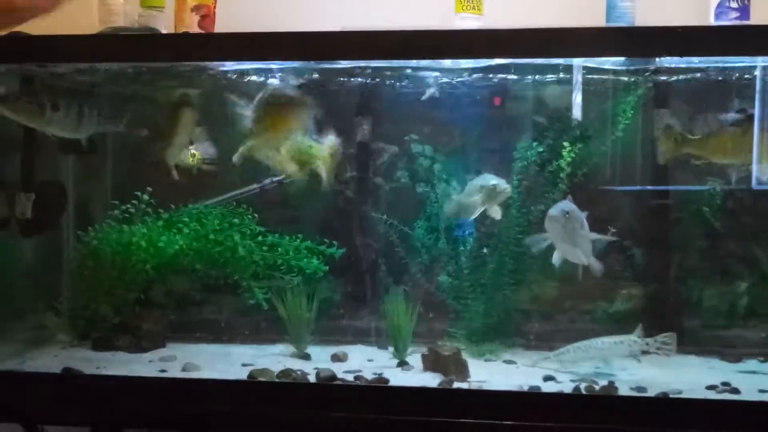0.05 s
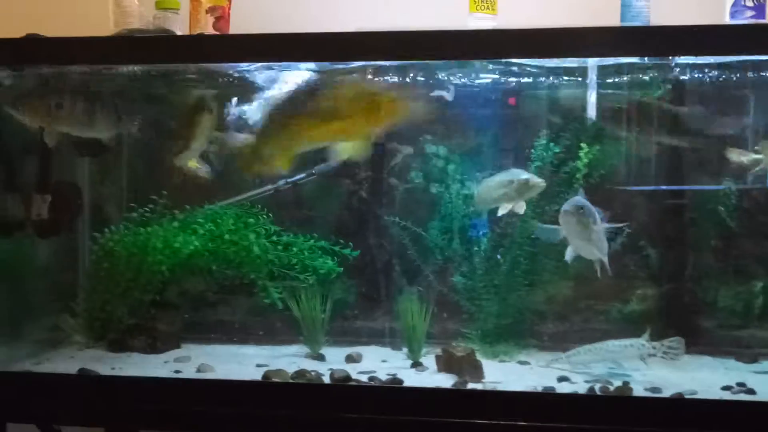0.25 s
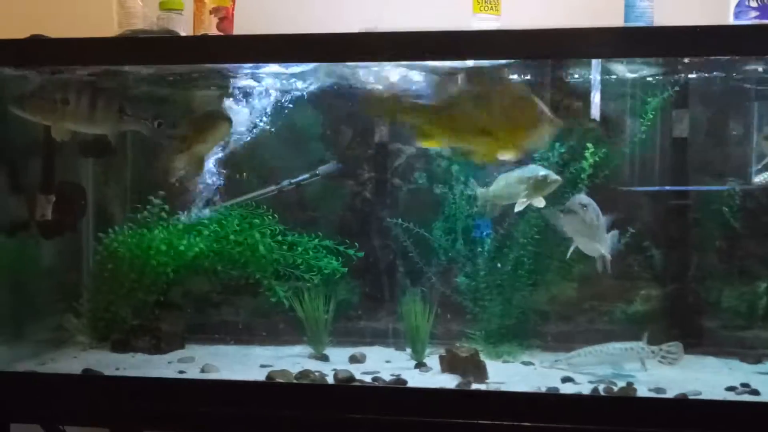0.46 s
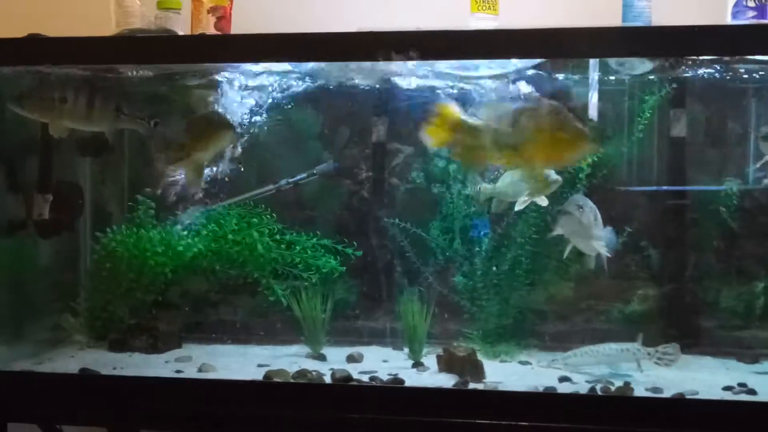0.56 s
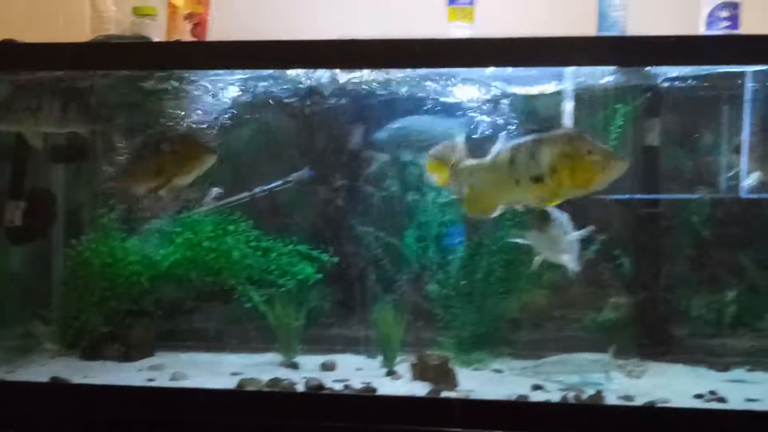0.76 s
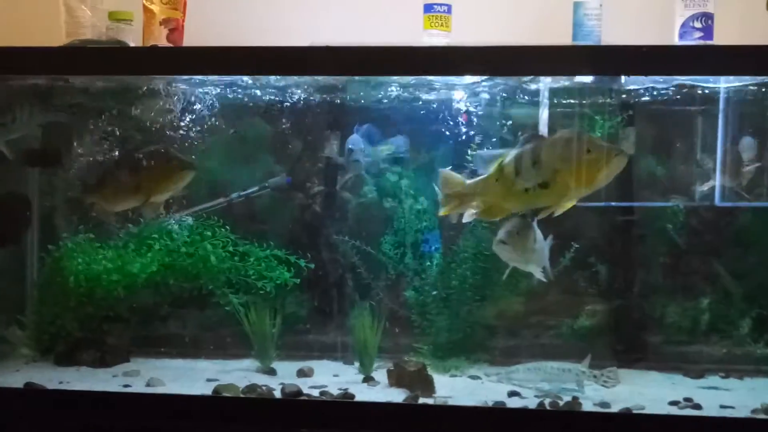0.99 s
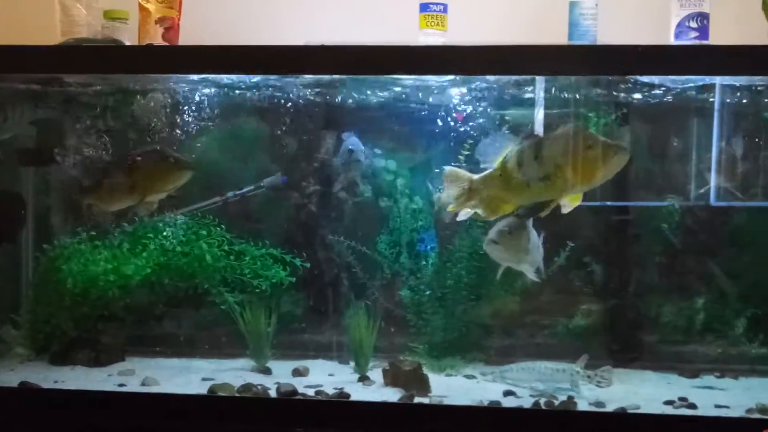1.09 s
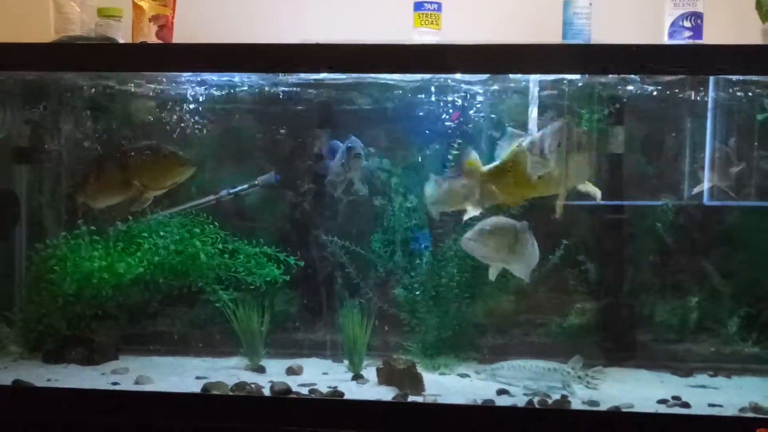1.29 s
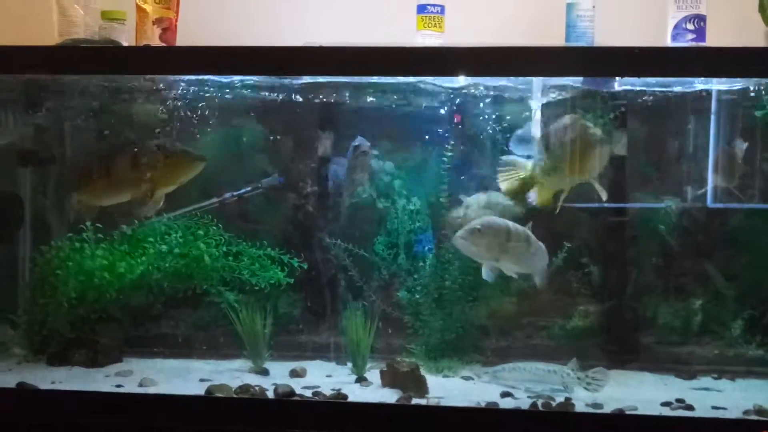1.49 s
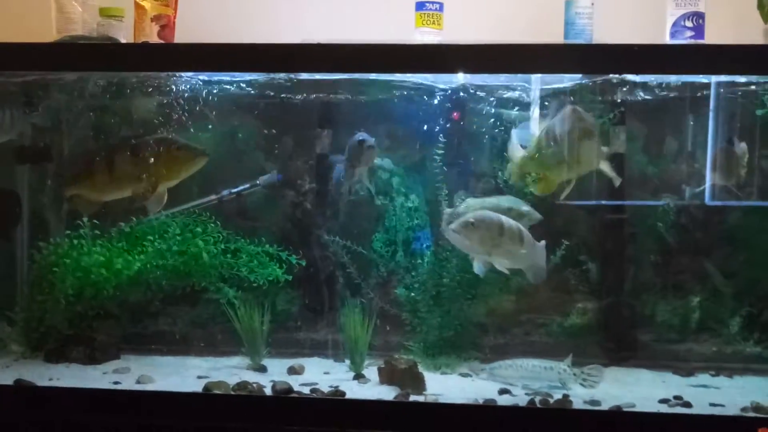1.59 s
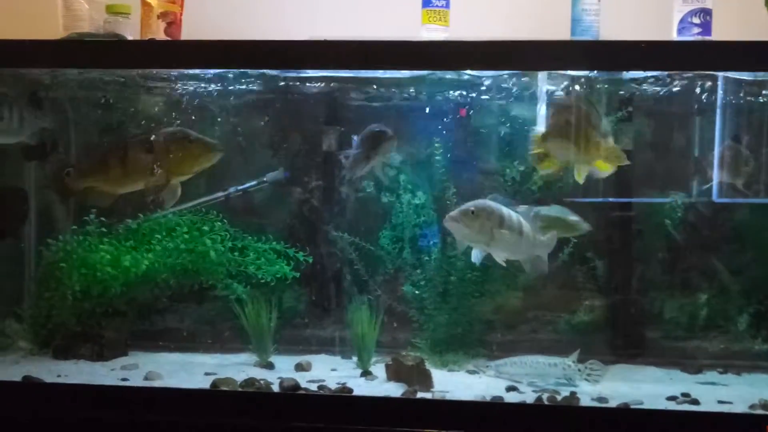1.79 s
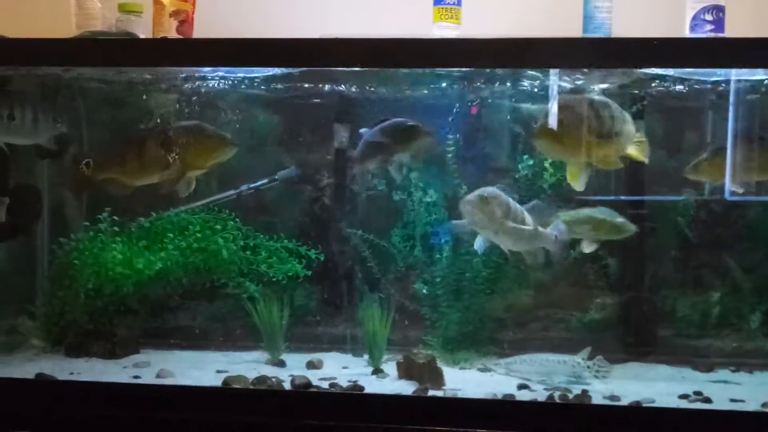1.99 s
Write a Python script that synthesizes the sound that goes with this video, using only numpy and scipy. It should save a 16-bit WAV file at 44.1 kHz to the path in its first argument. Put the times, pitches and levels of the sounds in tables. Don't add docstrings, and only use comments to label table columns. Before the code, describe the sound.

Big aquarium fish strike the surface, gulping and splashing hard, followed by fading drips and pump hum

```python
import sys
import numpy as np
from scipy import signal
from scipy.fft import rfft, irfft, next_fast_len
from scipy.io import wavfile
from scipy.ndimage import uniform_filter1d, map_coordinates

SR = 44100
rng = np.random.default_rng(int(sys.argv[2]) if len(sys.argv) > 2 else 0)


def gain_from_decibels(decibels):
    exponent = np.asarray(decibels, float) / 20
    return 10 ** exponent


def file_out(sig):
    cols = np.atleast_2d(sig).T
    lim = np.clip(cols, -1, 1)
    pcm = np.round(lim * 32767).astype(np.int16)
    wavfile.write(sys.argv[1], SR, pcm)


N = 90404
T = np.arange(N) / SR


def unit(x):
    return x / np.sqrt(np.mean(x ** 2) + 1e-20)


def wobble(rate):
    knots = rng.standard_normal(int(N * rate / SR) + 4)
    return map_coordinates(knots, [T * rate])


def filtered(x, response):
    size = next_fast_len(N + SR // 2)
    hz = np.fft.rfftfreq(size, 1 / SR)
    return irfft(rfft(x, size) * response(hz), size)[:N]


def along(points, hz):
    point_hz, value = np.transpose(points)
    return np.interp(np.log(hz + 1), np.log(point_hz + 1), value)


def coloured(x, spectrum):
    return unit(filtered(x, lambda hz: gain_from_decibels(along(spectrum, hz))))


def patchy(db):
    z = signal.stft(rng.standard_normal(N + 512), nperseg=512)[2]
    field = uniform_filter1d(rng.standard_normal(z.shape), 5, 0)
    field = unit(uniform_filter1d(field, 6, 1))
    return unit(signal.istft(z * gain_from_decibels(db * field), nperseg=512)[1][:N])


def grains(cycles, count):
    u = rng.random((count, 3))
    t = np.arange(600) / SR
    hz = 300 * 20 ** u[:, 1:2]
    ring = np.sin(2 * np.pi * hz * t) * np.exp(-hz * t / cycles) * (1 - np.exp(-hz * t))
    strength = hz * gain_from_decibels(-2.5 * np.log(u[:, 2:] + .02))
    at = (u[:, :1] * N).astype(int) + np.arange(len(t))
    return unit(np.bincount(at.ravel(), (strength * ring).ravel())[:N])


def room(x):
    # (frequency [Hz], t60 [s])
    decay = [(200, 0.42), (1500, 0.34), (5000, 0.33), (12000, 0.067)]
    hz, t, z = signal.stft(rng.standard_normal(SR // 2), SR, nperseg=256)
    fade = gain_from_decibels(-60 * t / along(decay, hz)[:, None])
    tail = signal.istft(z * fade, SR, nperseg=256)[1]
    late = np.pad(x, (350, 0))
    return signal.fftconvolve(late, tail / np.linalg.norm(tail))[:N]


def floor():
    # (frequency [Hz], level [dB per Hz])
    trickle_spectrum = [(20, -26), (40, -17), (70, -13), (140, -4), (450, -8), (1600, -18.5), (3100, -27),
                        (3700, -38), (6000, -64)]
    # (frequency [Hz], level [dB per Hz])
    hiss_spectrum = [(2120, -47), (3600, -7), (6640, -6), (7950, -1), (9390, -8.5), (10900, -9),
                     (13400, -26), (14900, -3), (15800, -10)]
    trickle_db, hum_db, hiss_db, patch_db = -51, -56.5, -71, .8
    hum_hz = 124.1
    trickle = gain_from_decibels(trickle_db + 0.27 * wobble(9.04)) * coloured(patchy(patch_db), trickle_spectrum)
    hum_level = gain_from_decibels(hum_db + 1.35 * wobble(13.45))
    hum = hum_level * np.sin(2 * np.pi * hum_hz * T + 0.23 * wobble(4.6))
    hiss = gain_from_decibels(hiss_db) * coloured(patchy(patch_db), hiss_spectrum)
    return trickle + hum + hiss


def bubbles():
    # (start [s], pitch [Hz], peak level [dB], t60 [s])
    single_bubbles = [(0.037, 2805, -39.5, 0.075), (0.053, 2980, -35.5, 0.036), (0.091, 2940, -60, 0.044),
                      (.12, 263, -36.5, 0.16), (0.241, 274, -36, 0.073), (.139, 2715, -41, 0.046),
                      (.166, 2350, -32, 0.058), (.292, 570, -43, 0.031), (.219, 743, -17, 0.032),
                      (0.226, 2630, -36, .04), (.26, 1416, -25.5, 0.067), (0.278, 1288, -7.5, 0.016),
                      (.298, 933, -19, 0.041), (0.305, 1533, -14.5, 0.025), (.405, 536, -29.5, 0.16),
                      (0.423, 2460, -45, 0.091), (.438, 830, -28.5, 0.045), (0.492, 1045, -33.5, 0.13),
                      (.523, 1717, -29.5, 0.073), (0.567, 1777, -40, 0.08), (.655, 670, -35, 0.052),
                      (1.984, 1565, -32.5, 0.041), (.945, 656, -36, 0.11), (1.277, 2900, -54, 0.048)]
    pitch_rise, attack_cycles, wet_db = 0.029, 5.3, -6
    mix = np.zeros(N)
    for start_s, hz, db, t60 in single_bubbles:
        t = np.maximum(T - start_s, 0)
        swell = np.sin(np.pi / 2 * np.minimum(t * hz / attack_cycles, 1)) ** 2
        ring = np.sin(2 * np.pi * hz * t * (1 + pitch_rise * t / t60))
        bubble = swell * gain_from_decibels(db - 60 * t / t60) * ring
        mix += bubble + gain_from_decibels(wet_db) * room(bubble)
    return mix


def slaps():
    # (start [s], coarse foam [dB], fine foam [dB], spray [dB], t60 [s])
    slap_events = [(0.033, -40.5, -47.5, -59, 0.39), (0.138, -50, -48, -63.5, 1),
                   (0.218, -30, -43, -48.5, 0.42), (0.254, -36.5, -57, -55.5, 0.55),
                   (0.295, -36, -40, -42, 0.44), (.513, -42.5, -41.5, -44.5, 0.33),
                   (.61, -46, -46, -66, 0.31), (0.673, -56, -51.5, -52.5, 0.29),
                   (0.777, -44.5, -51, -56, 0.25), (0.859, -49.5, -67, -65, 0.66),
                   (0.933, -45, -46.5, -54, 0.31), (1.696, -65, -73, -64.5, 0.46),
                   (1.741, -58, -58, -67, 0.19), (1.984, -37.5, -47, -72, 0.26)]
    # (start [s], coarse foam [dB], fine foam [dB], spray [dB], t60 [s])
    wash_events = [
        (0.433, -42, -44, -49, 0.73),
        (0.763, -59, -46.5, -58, 0.38),
        (1.75, -68, -59.5, -58, 0.45),
        (2.015, -70, -70, -58, .8),
    ]
    # (frequency [Hz], level [dB per Hz])
    coarse_spectrum = [(76, -46), (130, -15), (344, -8.5), (609, -10), (731, -5.5), (1140, -9), (1330, -8),
                       (2000, -19.5), (2600, -31), (4400, -120)]
    # (frequency [Hz], level [dB per Hz])
    fine_spectrum = [(1100, -22), (1700, -7), (2400, -4), (3300, -7), (3800, -12.5), (4600, -20.5),
                     (6000, -26)]
    # (frequency [Hz], level [dB per Hz])
    spray_spectrum = [(3000, -40), (4500, -11), (6100, -5.5), (7700, -1), (9240, -6.5), (10800, -7),
                      (12800, -23), (14700, -5), (15800, -16)]
    slap_attack_s, wash_attack_s = .002, .02
    snap_db, snap_t60_s = -6, .05
    flutter_db, foam_patch_db, spray_patch_db, wet_db = 2, 3, 2.5, -6
    grains_per_s, grain_cycles, grain_share = 2500, 6, .55

    events = list(slap_events) + list(wash_events)
    start_s, coarse_db, fine_db, spray_db, t60 = np.transpose(events)[..., None]
    attack_s = np.repeat([slap_attack_s, wash_attack_s], [len(slap_events), len(wash_events)])[:, None]
    t = np.maximum(T - start_s, 0)
    decay = gain_from_decibels(-60 * t / t60) + gain_from_decibels(snap_db - 60 * t / snap_t60_s)
    shape = (1 - np.exp(-t / attack_s)) * decay

    def burst(db):
        level = np.sqrt(np.sum((gain_from_decibels(db) * shape) ** 2, axis=0))
        return level * gain_from_decibels(flutter_db * wobble(44.36))

    foam_bubbles = grains(grain_cycles, count=int(grains_per_s * N / SR))
    froth = grain_share * foam_bubbles + (1 - grain_share) * patchy(foam_patch_db)
    coarse = burst(coarse_db) * coloured(froth, coarse_spectrum)
    fine = burst(fine_db) * coloured(froth, fine_spectrum)
    spray = burst(spray_db) * coloured(patchy(spray_patch_db), spray_spectrum)
    splash = coarse + fine + spray
    return splash + gain_from_decibels(wet_db) * room(splash)


def gulps():
    # (peak time [s], pitch
    # [Hz], peak level [dB], swell [s], t60 [s])
    air_pockets = [(.05, 365.6, -26, .012, 0.033), (0.066, 367, -25, .012, 0.056),
                   (.082, 499, -32.5, 0.017, 0.076), (.105, 446.5, -31.5, 0.013, .1),
                   (.128, 485, -41.5, .012, .1), (0.226, 1439, -19, 0.0065, 0.038),
                   (0.231, 1213, -20, .01, 0.078), (0.234, 364.6, -34.5, 0.0125, 0.18),
                   (.262, 366.4, -29.5, 0.01194, 0.14), (.301, 257, -21, 0.00634, 0.15),
                   (0.299, 362.6, -28, 0.0122, 0.173), (.324, 174.3, -11.5, 0.03345, 0.1),
                   (.358, 194.4, -27, .014, 0.058), (0.369, 258.5, -18.5, 0.028, 0.16),
                   (.384, 312, -29, 0.0117, .08), (0.397, 362.3, -22, 0.016, 0.085),
                   (.418, 253.5, -26.5, .012, 0.068), (0.437, 354, -22, .01, 0.029),
                   (.45, 448.7, -27, 0.01722, 0.045), (.445, 256.7, -31.5, 0.01428, 0.14),
                   (.488, 234, -50, .015, 0.072), (.776, 814.4, -31.5, .018, 0.19),
                   (.89, 812, -41.5, .018, 0.093), (1.995, 158, -43, 0.015, .15)]
    rise_hz_per_s = 220
    rough_db, surge_db, wet_db = -0.5, -9, -12.5

    peak_s, hz, db, swell_s, t60 = np.transpose(air_pockets)[..., None]
    t = np.maximum(T - peak_s + swell_s, 0)
    swell = np.sin(np.pi / 2 * np.minimum(t / swell_s, 1)) ** 2
    level = swell * gain_from_decibels(db - 60 * np.maximum(T - peak_s, 0) / t60)
    ring = np.sin(2 * np.pi * t * (hz + rise_hz_per_s * (t / 2 - swell_s)))
    pockets = np.sum(level * ring, axis=0) * gain_from_decibels(rough_db * wobble(50))

    def heave_band(f):
        return 1j * f / (20 + 1j * f) / (1 + 1j * f / 35) ** 2

    push = (level * hz.min() / hz).max(axis=0)
    heave = filtered(gain_from_decibels(surge_db) * push, heave_band)
    return pockets + gain_from_decibels(wet_db) * room(pockets) + heave


def scene():
    return (floor() + bubbles() + slaps() + gulps())[None]


def roll_off(x):
    return signal.sosfilt(signal.butter(12, 16150, fs=SR, output="sos"), x)


def record(dry):
    top_hz = 15830
    mix = filtered(dry[0], lambda hz: hz < top_hz)[None]
    return roll_off(mix)


dry = scene()
out = record(dry)
file_out(out)
```